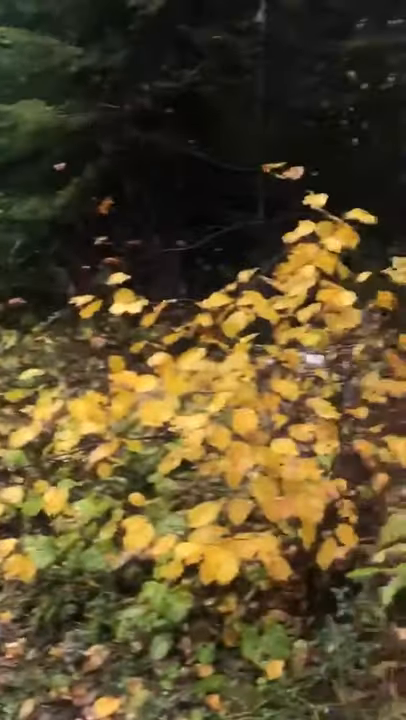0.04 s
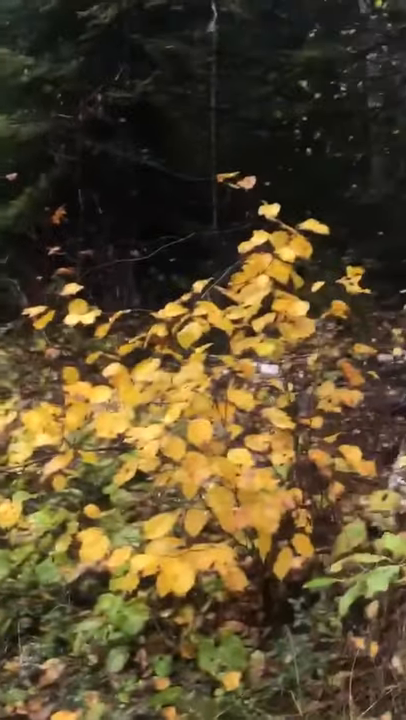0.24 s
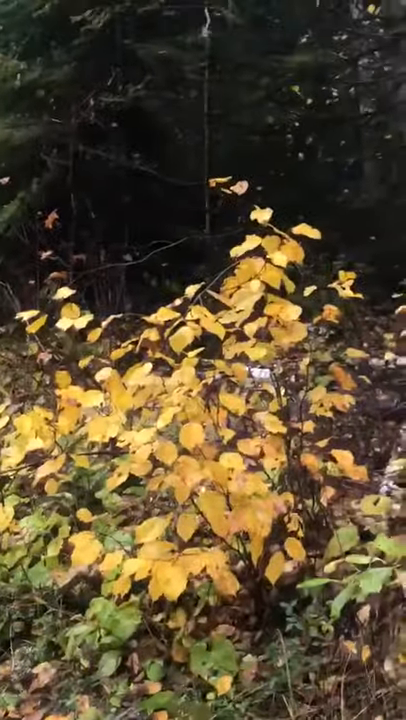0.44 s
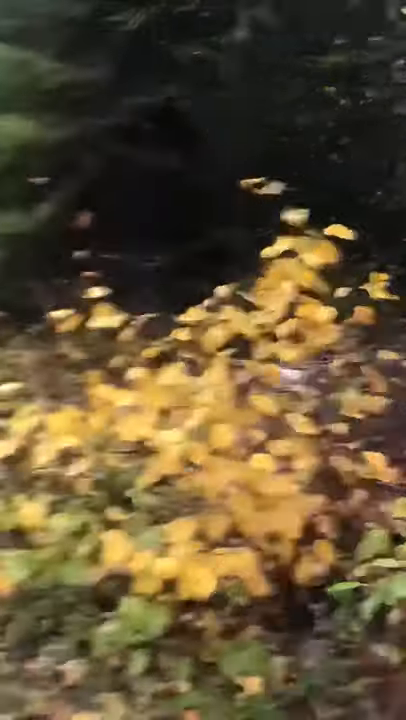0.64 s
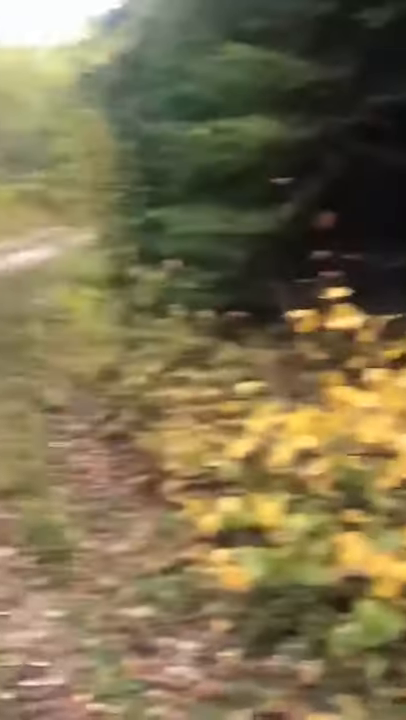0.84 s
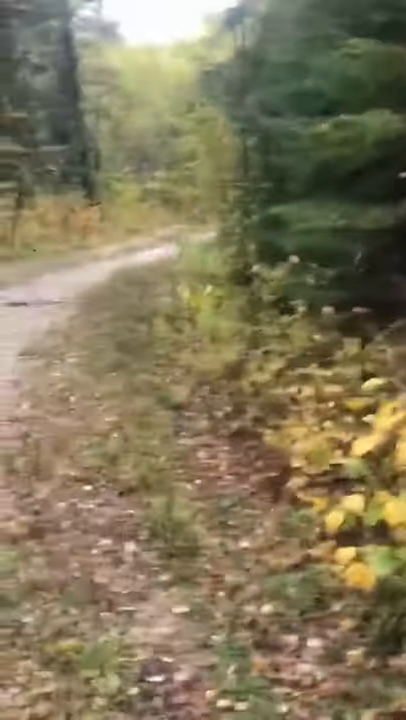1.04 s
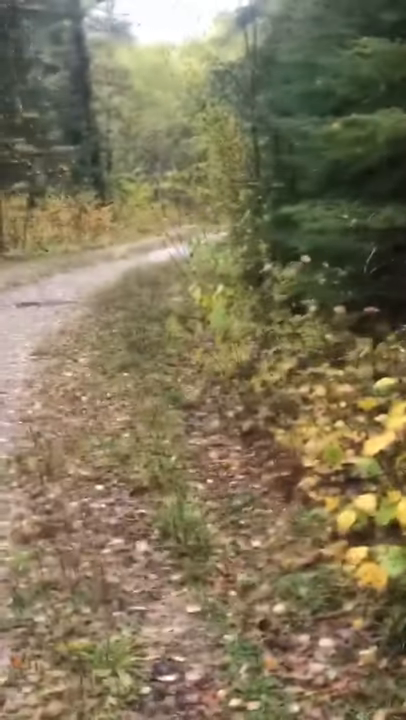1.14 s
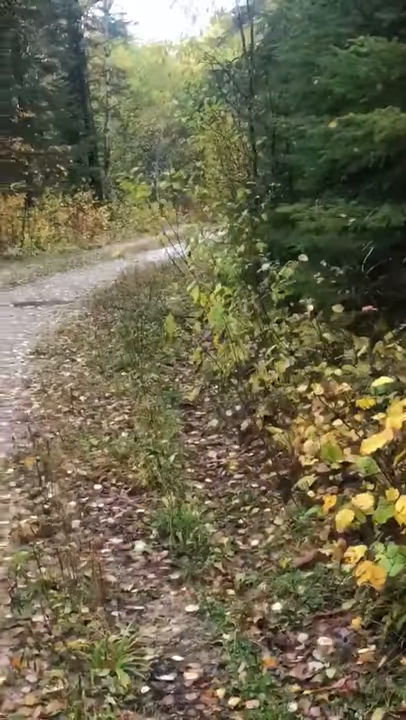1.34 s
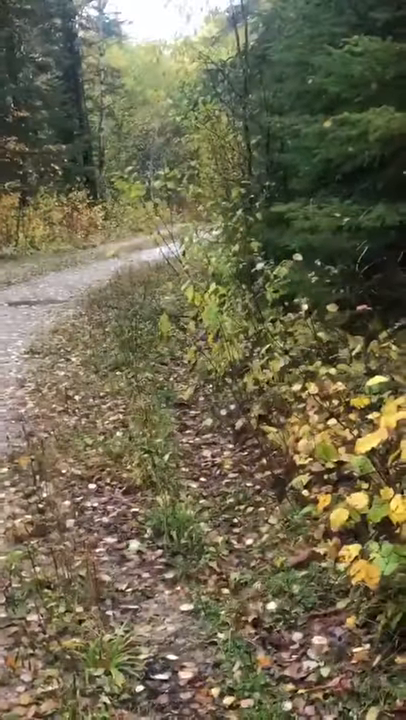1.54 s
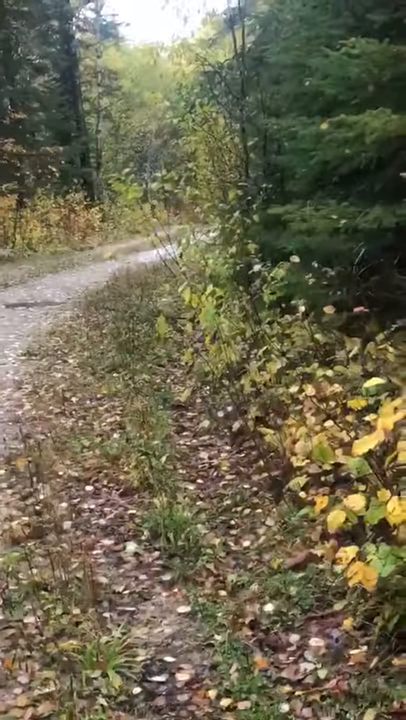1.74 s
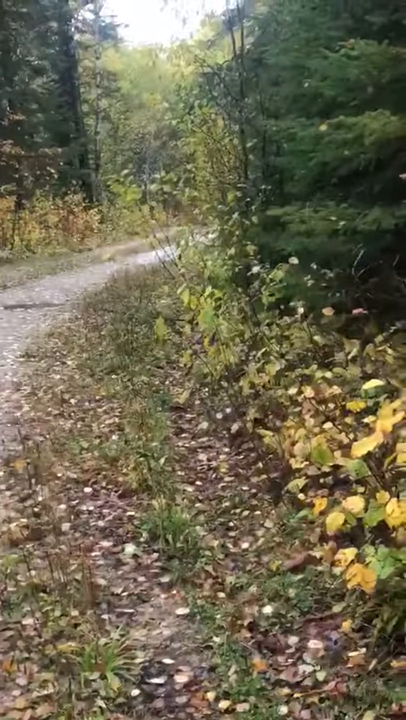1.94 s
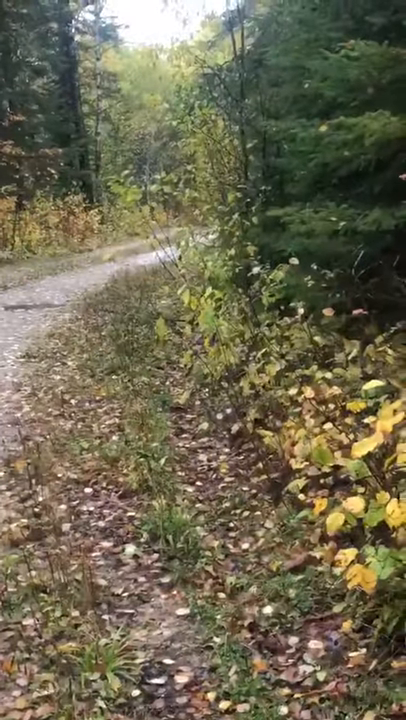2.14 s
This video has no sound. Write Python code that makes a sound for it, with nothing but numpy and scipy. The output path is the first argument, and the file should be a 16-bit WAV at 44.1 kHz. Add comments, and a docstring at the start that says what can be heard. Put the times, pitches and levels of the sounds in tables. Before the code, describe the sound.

A rifle fires twice in the woods, the second shot a second after the first. Both start with a sharp crack and blast, followed by echoes from the trees that grow duller as they die away over quiet outdoor air.

```python
"""Two rifle shots a second apart, heard from a forest trail over a low outdoor rumble and faint ticks. Each
begins with the bullet's sharp crack; the muzzle blast follows, its loudest peaks flattened. Near spruces and
single trunks then reflect the sound, and a dull thud comes about 0.1 s after the shot. Farther stands of trees
answer later, while scattering from needles and branches draws the shot out into a long tail that loses its
treble first."""
import sys
import numpy as np
from scipy import signal
from scipy.io import wavfile
from scipy.ndimage import uniform_filter1d

SR = 44100
rng = np.random.default_rng(int(sys.argv[2]) if len(sys.argv) > 2 else 0)


def generate_wav(sig):
    """Save sig (samples, or channels by samples) to the path in sys.argv[1] as 16-bit PCM at SR."""
    pcm = np.round(np.clip(np.atleast_2d(sig).T, -1, 1) * 32767).astype(np.int16)
    wavfile.write(sys.argv[1], SR, pcm)


N = 97020
T = np.arange(N) / SR

# Shots: (time [s], level [dB], hold before the forest's scatter decays [s])
SHOT_EVENTS = [(0.2332, -0.5, 0.147), (1.2633, -0.3, 0.13)]
# Faint first ticks, the bullet's double crack, its fizz: (delay [s], hold [s], release [s], level [dB])
CRACK_BURSTS = [(-0.0205, 0.001, 0.0027, -38), (-0.005, 0.003, 0.002, -32.5),
                (0.0005, 0.0008, 0.0005, -5.5), (0.0026, 0.0015, 0.0006, -6.5),
                (0.005, 0.008, 0.004, -23.5)]
# Spectra of the crack and the muzzle blast: (frequency [Hz], level [dB])
CRACK_SPECTRUM = [(40, -17), (150, -3), (500, -16), (900, -2), (2400, -1), (3700, 3.5), (6000, -0.5),
                  (10000, -2), (15500, -4.5)]
BLAST_SPECTRUM = [(40, -17), (150, -6), (500, -8.5), (900, 1), (1500, -1.5), (2400, -16.5), (3700, 0),
                  (5500, 0.5), (8000, -3), (15500, -10)]
# Spectrum of the scatter from needles and branches: (frequency [Hz], level [dB])
FOREST_SPECTRUM = [(30, -51), (60, -23), (110, -21), (200, -16.5), (400, -12.5), (600, -9.5), (1000, -4),
                   (1600, -4), (2500, -1), (3700, 1), (5400, 0.5), (6500, -0.5), (7500, -5), (10500, -8),
                   (12500, -12.5), (15500, -14.5)]
# Late decay of that scatter: (frequency [Hz], time to fall 60 dB [s])
FOREST_DECAY = [(100, 3.4), (400, 1.7), (1000, 2.26), (1700, 2.38), (2500, 1.64), (3700, 1.18),
                (5400, 1.026), (7700, 0.76), (10500, 0.57), (15500, 0.43)]
# Echoes from single trunks: (delay [s], release [s], level [dB])
TRUNK_ECHOES = [(0.0406, 0.003, -7.5), (0.083, 0.003, -17), (0.111, 0.004, -10.5), (0.214, 0.006, -11),
                (0.236, 0.005, -22), (0.2732, 0.0012, -12), (0.282, 0.003, -10), (0.565, 0.0041, -26),
                (0.601, 0.0039, -29), (0.624, 0.0016, -25.5), (0.661, 0.0042, -29.5)]
# Echoes from the nearest spruces and from farther stands: (delay [s], spread [s], level [dB])
SPRUCE_ECHOES = [(0.043, 0.0022, -11.5), (0.059, 0.0049, -13), (0.084, 0.005, -14), (0.111, 0.015, -13.5),
                 (0.138, 0.004, -15.5), (0.163, 0.009, -19)]
STAND_ECHOES = [(0.255, 0.019, -24), (0.372, 0.029, -34.5), (0.635, 0.052, -39.5), (0.78, 0.049, -42.5)]
# Spectra of the three kinds of echo: (frequency [Hz], level [dB])
TRUNK_SPECTRUM = [(60, -22), (400, -13), (750, -2), (1300, 3.5), (2700, 0.5), (4500, -10.5), (8000, -24),
                  (15500, -50)]
SPRUCE_SPECTRUM = [(60, -43), (700, -19), (2000, -11), (3300, 7.5), (5500, 4), (6600, -13), (7600, -2),
                   (15500, -18)]
STAND_SPECTRUM = [(60, -37), (300, -13), (600, -9), (900, 3.5), (1900, 1), (3000, -2.5), (6000, -21),
                  (15500, -55)]
# Dull thuds after the shots: (time [s], spread [s], level [dB])
THUD_EVENTS = [(0.349, 0.0033, -29), (1.3644, 0.0015, -14.5), (1.378, 0.012, -23.5)]
# Faint ticks in the undergrowth: (time [s], level [dB])
LEAF_TICKS = [(0.121, -50), (0.706, -48), (0.939, -51)]
# Spectra of the thuds, the ticks and the outdoor air: (frequency [Hz], level [dB])
THUD_SPECTRUM = [(40, -29), (100, -5.5), (250, -8), (420, -1.5), (800, 3), (1150, -2), (3000, -24),
                 (15500, -57)]
TICK_SPECTRUM = [(100, -10), (3000, 0), (12000, 2), (15500, -2)]
AIR_SPECTRUM = [(20, -31), (45, -16.5), (75, -3.5), (110, 0.5), (180, -0.5), (330, -6), (500, -8),
                (900, -14), (1300, -13.5), (1700, -19.5), (2500, -21.5), (3700, -24), (5400, -27.5),
                (7700, -34.5), (10500, -40), (15500, -40)]


def bullet_crack(start):
    """A supersonic bullet's shock wave is heard as brief broadband bursts."""
    envelope = sum(amp(db) * burst(start + delay, hold, release)
                   for delay, hold, release, db in CRACK_BURSTS)
    return shaped_noise(envelope, CRACK_SPECTRUM)


def muzzle_blast(start, push_hz=75, push_width_s=0.0047):
    """Sudden expansion of gas radiates a noise burst and a slow pressure swing, the push."""
    envelope = amp(-9) * burst(start + 0.0145, hold=0.012, release=0.0027)
    from_peak = T - start - 0.0168
    push = -amp(-32) * np.cos(2 * np.pi * push_hz * from_peak) * np.exp(-abs(from_peak) / push_width_s)
    return shaped_noise(envelope, BLAST_SPECTRUM) + push


def forest_scatter(start, hold, pattern, onset_s=0.013, rise_s=0.063, early_s=0.22):
    """Multiple scattering builds as the blast spreads, then decays exponentially, treble first."""
    hz, t, spectra = signal.stft(tint(pattern, FOREST_SPECTRUM), SR, nperseg=256, noverlap=192)
    age = np.maximum(t - hold, 0)
    decay_db = 60 * age / curve_at(FOREST_DECAY, hz)[:, None]
    early_drop_db = 2.5 * (1.5 - np.exp(-age / early_s))  # the near trees fall silent sooner
    faded = spectra * amp(-decay_db - early_drop_db)
    tail = signal.istft(faded, SR, nperseg=256, noverlap=192)[1][:N]
    rise = np.sqrt(np.clip((T - onset_s) / rise_s, 0, 1))
    return delayed(amp(-11.5) * tail * rise, start)


def tree_echoes(start, pattern):
    """Reflection returns bright bursts from spruces, slaps from trunks and crackle from far stands."""
    spruces = shaped_noise(swells(SPRUCE_ECHOES), SPRUCE_SPECTRUM)
    slaps = sum(amp(db) * burst(delay, 0, release) for delay, release, db in TRUNK_ECHOES)
    trunks = shaped_noise(slaps, TRUNK_SPECTRUM)
    stands = tint(swells(STAND_ECHOES) * pattern, STAND_SPECTRUM)
    return delayed(spruces + trunks + stands, start)


def far_reflections(clicks_per_s=900):
    """Separate reflections arrive at random and stand out of a diffuse wash."""
    arrivals = rng.random(N) < clicks_per_s / SR
    clicks = unit(arrivals * rng.choice([-1, 1], N) * rng.uniform(0.52, 1, N))
    return blend(clicks, clumpy_noise(depth_db=2.5, clump_samples=300), share=0.6)


def thuds():
    """Short noise pulses with little treble are heard as knocks, perhaps the bullets landing."""
    return shaped_noise(swells(THUD_EVENTS), THUD_SPECTRUM)


def background():
    """Ambient noise: a low outdoor rumble and hiss, with a few quickly damped leaf ticks."""
    air = amp(-41) * tint(clumpy_noise(depth_db=0.5, clump_samples=2000), AIR_SPECTRUM)
    ticks = sum(amp(db) * burst(start, hold=0, release=0.0048) for start, db in LEAF_TICKS)
    return air + shaped_noise(ticks, TICK_SPECTRUM)


def amp(db):
    """Amplitude grows tenfold for every 20 dB."""
    return 10 ** (np.asarray(db) / 20)


def unit(x):
    """Normalisation to an rms of 1."""
    return x / np.sqrt(np.mean(x ** 2) + 1e-20)


def curve_at(points, hz):
    """Interpolation on a log-frequency axis."""
    frequencies, values = np.transpose(points)
    return np.interp(np.log(hz + 1), np.log(frequencies + 1), values)


def tint(x, spectrum, size=4096):
    """Minimum-phase filtering imposes a spectrum causally, at unit power gain."""
    gain = unit(amp(curve_at(spectrum, np.fft.rfftfreq(size, 1 / SR))))
    log_gain = np.log(np.r_[gain, gain[-2:0:-1]] + 1e-6)
    response = np.exp(np.conj(signal.hilbert(log_gain)))
    taps = np.fft.ifft(response).real
    return signal.fftconvolve(x, taps[:size // 2])[:N]


def shaped_noise(envelope, spectrum):
    """Source and filter: white noise follows an envelope, then takes on a spectrum."""
    return tint(envelope * rng.standard_normal(N), spectrum)


def clumpy_noise(depth_db, clump_samples):
    """Random amplitude modulation gathers noise into clumps, as in dense reflections."""
    clumps = unit(uniform_filter1d(rng.standard_normal(N), clump_samples))
    return unit(rng.standard_normal(N) * amp(depth_db * np.clip(clumps, -3, 3)))


def burst(start, hold, release):
    """Transient envelope: an 8-sample attack, a hold and an exponential release."""
    age = T - start
    attack = np.clip(age * SR / 8, 0, 1)
    return attack * np.exp(-np.maximum(age - hold, 0) / release)


def swells(rows):
    """Superposition of Gaussian envelopes."""
    return sum(amp(db) * np.exp(-.5 * ((T - centre) / spread) ** 2) for centre, spread, db in rows)


def delayed(sound, seconds):
    """Pure delay, cut to the scene's length."""
    return np.pad(sound, (round(seconds * SR), 0))[:N]


def blend(first, second, share):
    """Uncorrelated signals add in power; the first supplies the given share."""
    return np.sqrt(share) * first + np.sqrt(1 - share) * second


def scene(same_path=0.71):
    """Direct and reflected sound superpose; both shots meet the same trees, so their echoes correlate."""
    *near, near_common = [clumpy_noise(depth_db=1.43, clump_samples=130)
                          for _ in range(len(SHOT_EVENTS) + 1)]
    *far, far_common = [far_reflections() for _ in range(len(SHOT_EVENTS) + 1)]
    mix = background() + thuds()
    for k, (start, db, hold) in enumerate(SHOT_EVENTS):
        direct = bullet_crack(start) + muzzle_blast(start)
        tail = forest_scatter(start, hold, blend(near_common, near[k], same_path))
        echoes = tree_echoes(start, blend(far_common, far[k], same_path))
        mix += amp(db) * (direct + tail + echoes)
    return mix[None]


def record(dry, saturation=1.24, cutoff_hz=15950):
    """Soft clipping rounds off the loudest peaks; a low-pass filter then limits the band."""
    rounded = saturation * np.tanh(dry / saturation)
    low_pass = signal.firwin(401, cutoff_hz, window=("kaiser", 8), fs=SR)
    return signal.oaconvolve(rounded, low_pass[None], "same")


dry = scene()
out = record(dry)
generate_wav(out)
```